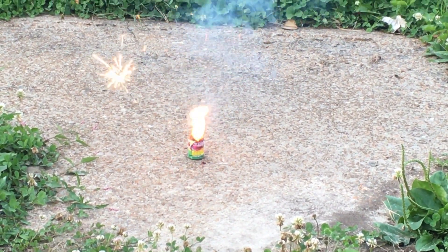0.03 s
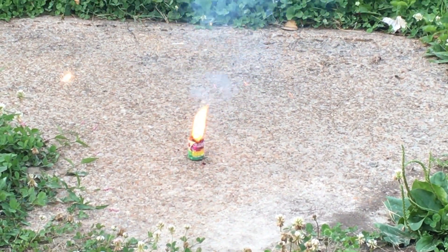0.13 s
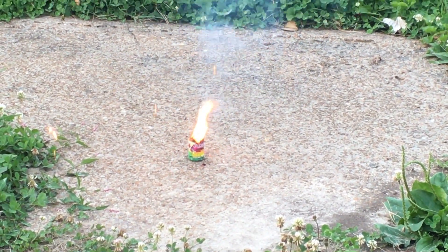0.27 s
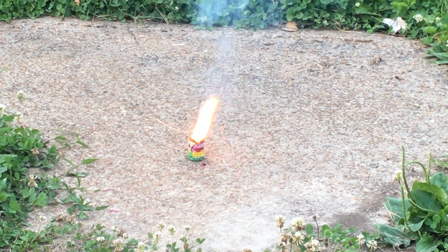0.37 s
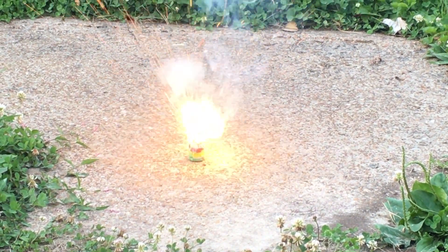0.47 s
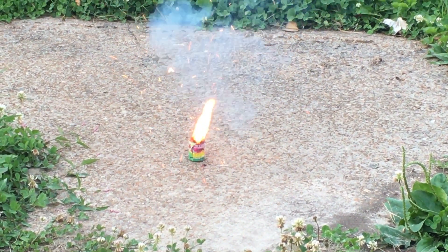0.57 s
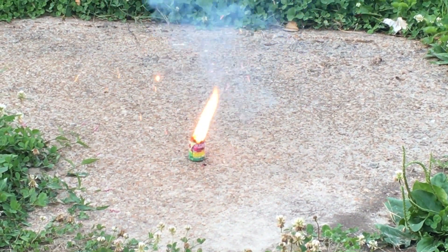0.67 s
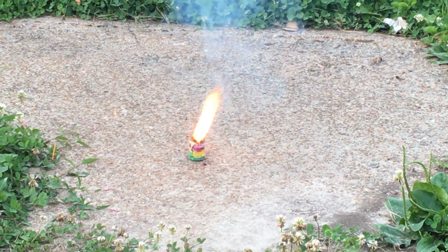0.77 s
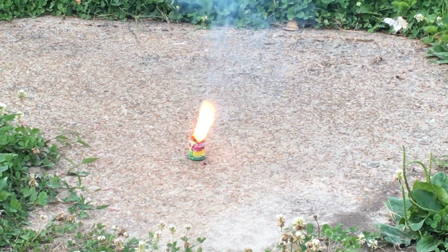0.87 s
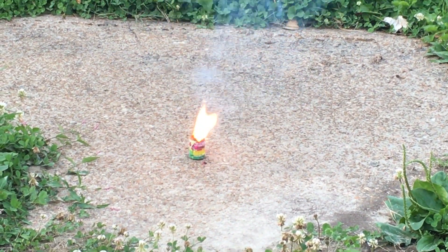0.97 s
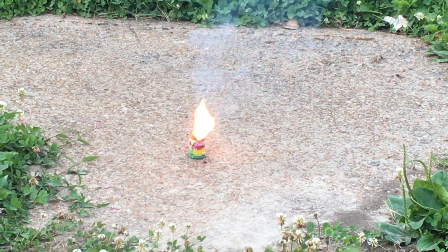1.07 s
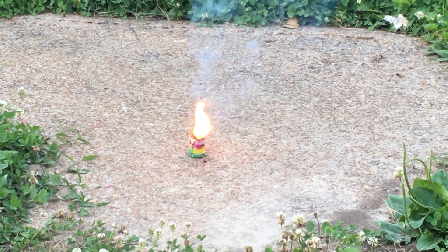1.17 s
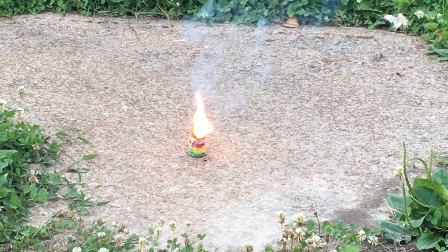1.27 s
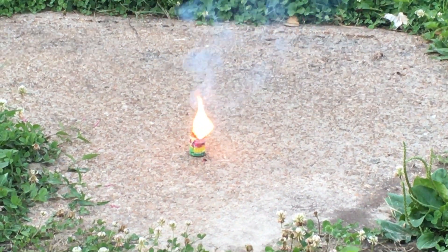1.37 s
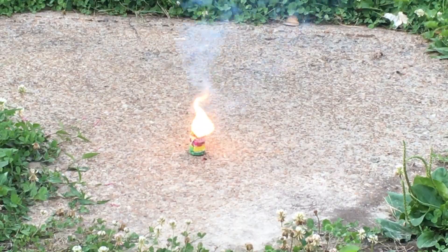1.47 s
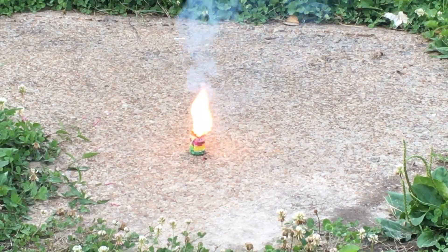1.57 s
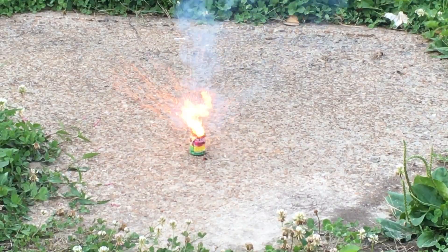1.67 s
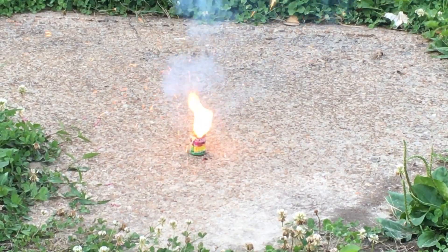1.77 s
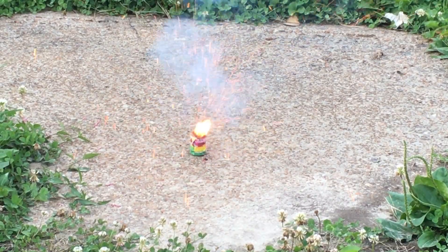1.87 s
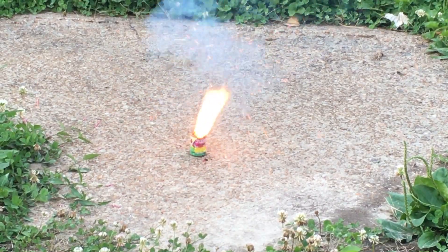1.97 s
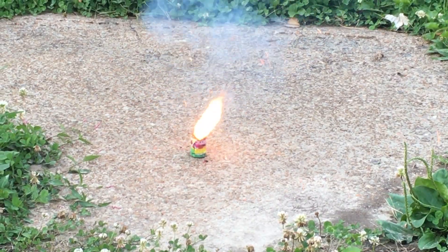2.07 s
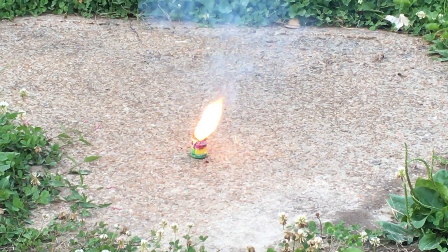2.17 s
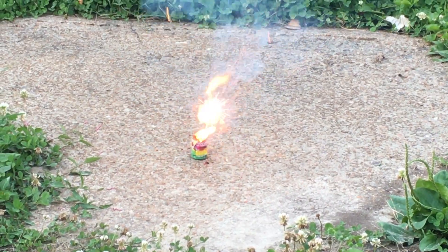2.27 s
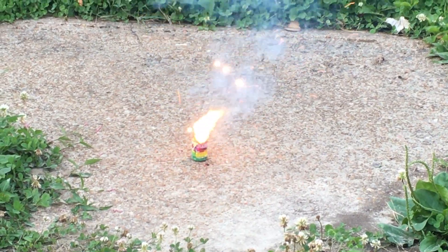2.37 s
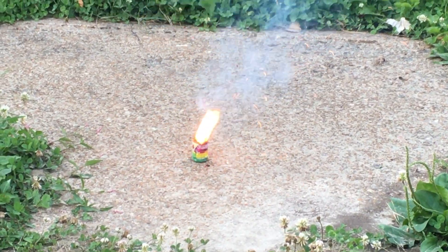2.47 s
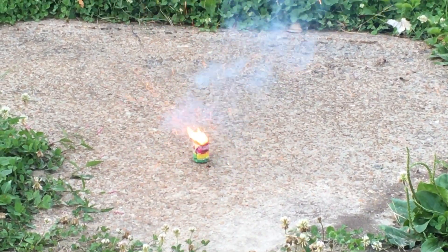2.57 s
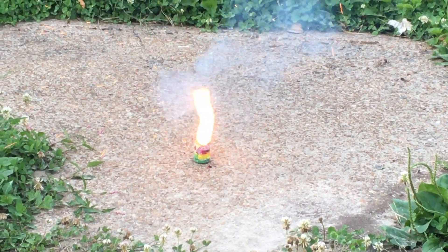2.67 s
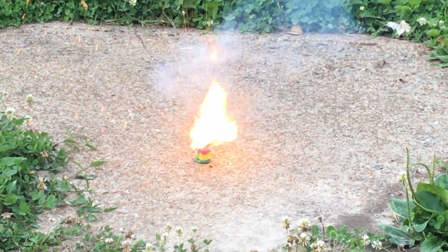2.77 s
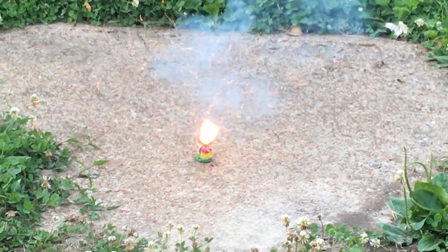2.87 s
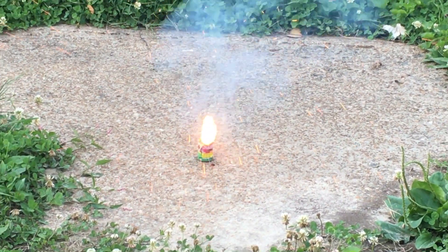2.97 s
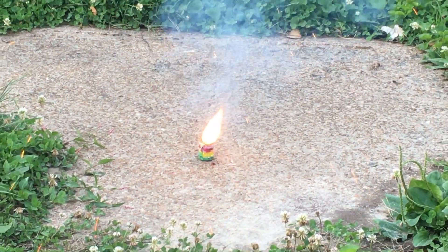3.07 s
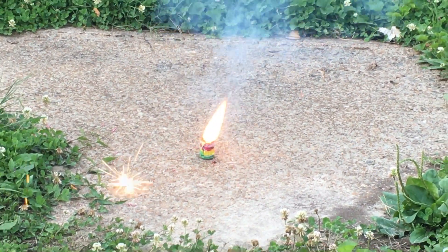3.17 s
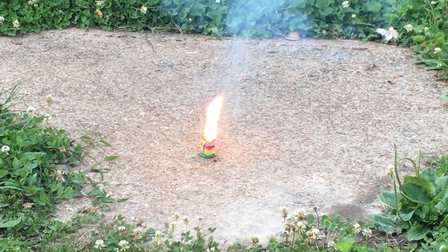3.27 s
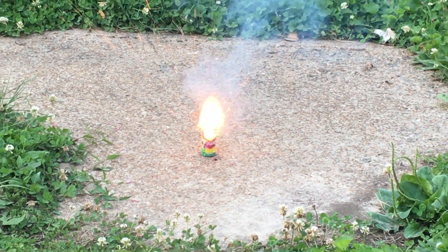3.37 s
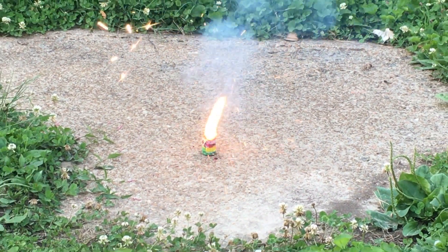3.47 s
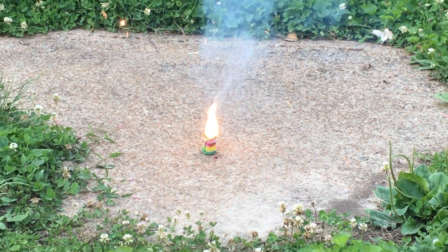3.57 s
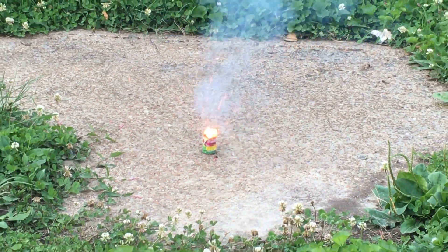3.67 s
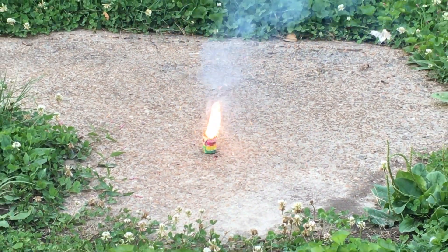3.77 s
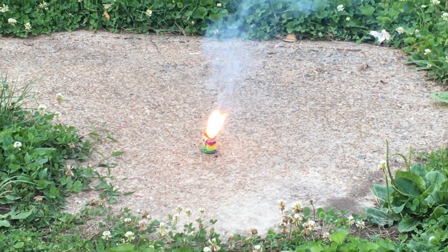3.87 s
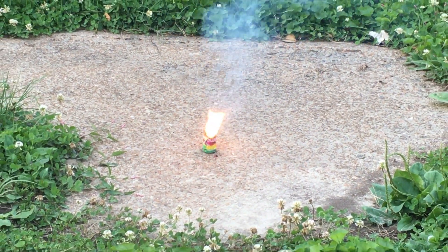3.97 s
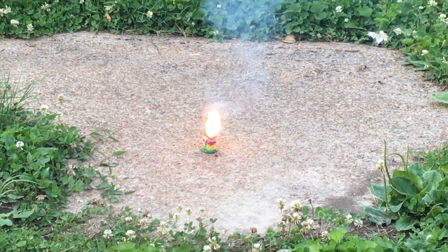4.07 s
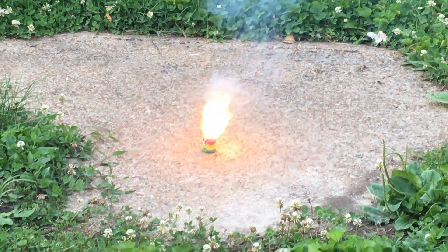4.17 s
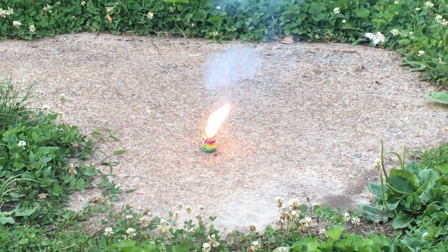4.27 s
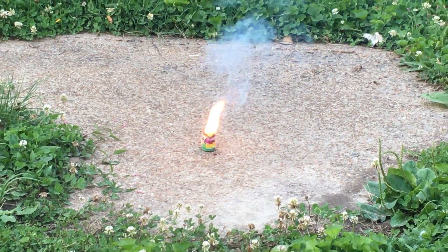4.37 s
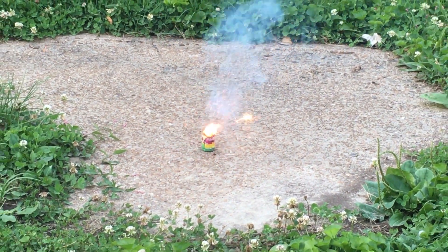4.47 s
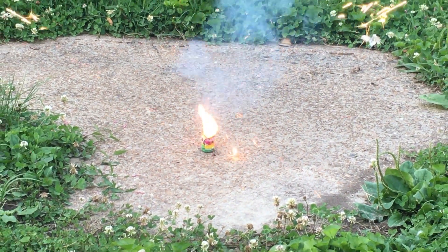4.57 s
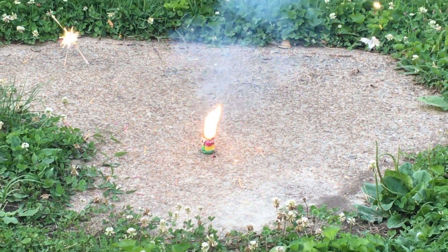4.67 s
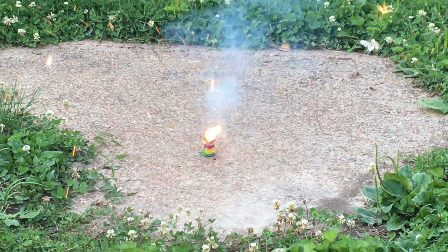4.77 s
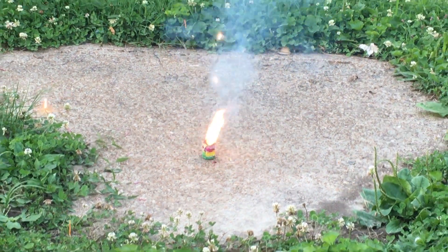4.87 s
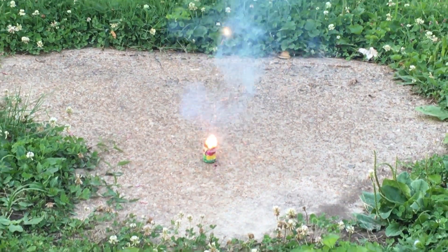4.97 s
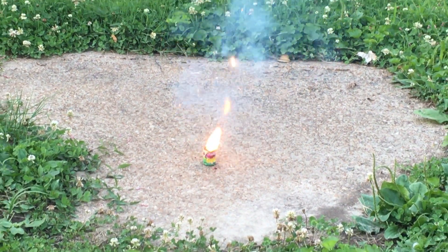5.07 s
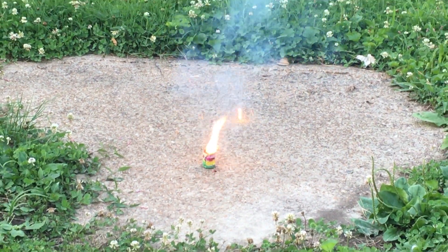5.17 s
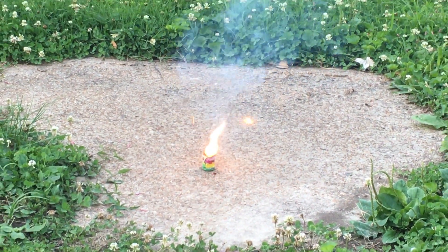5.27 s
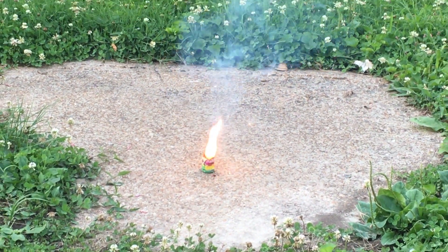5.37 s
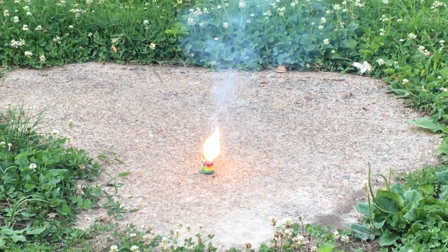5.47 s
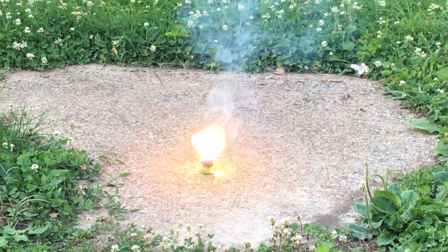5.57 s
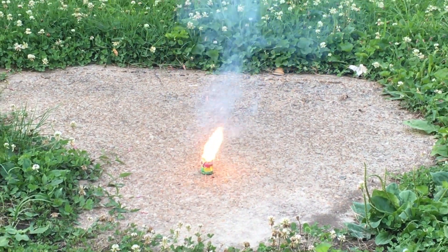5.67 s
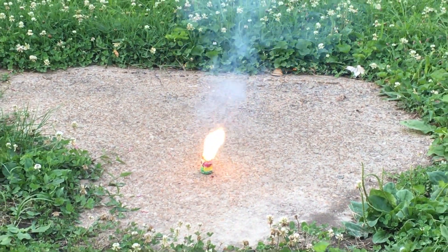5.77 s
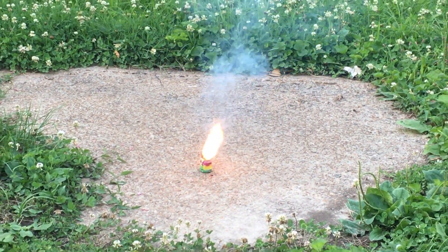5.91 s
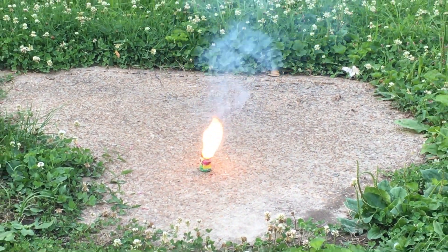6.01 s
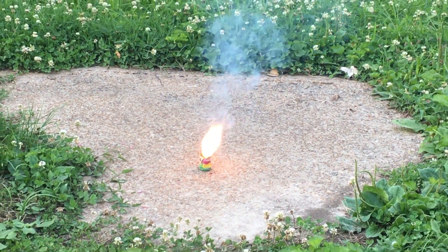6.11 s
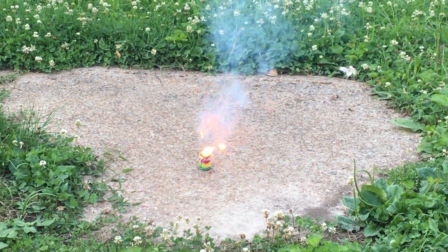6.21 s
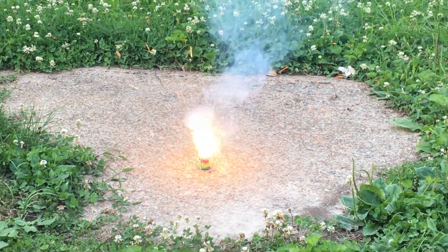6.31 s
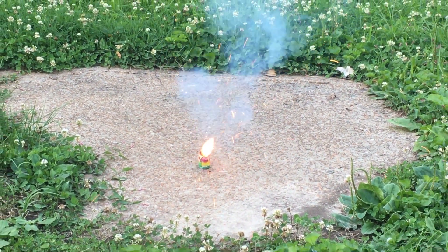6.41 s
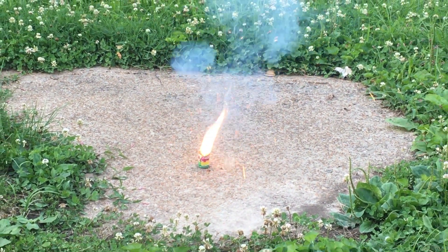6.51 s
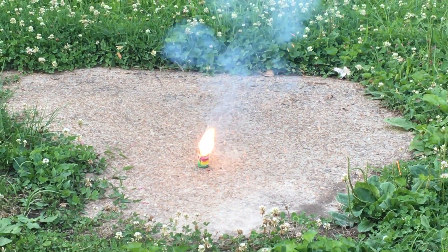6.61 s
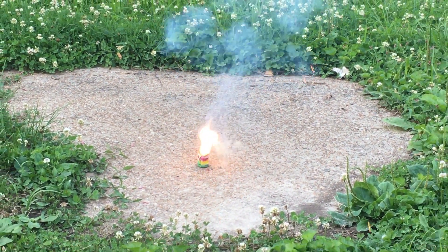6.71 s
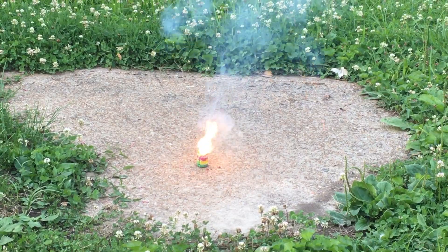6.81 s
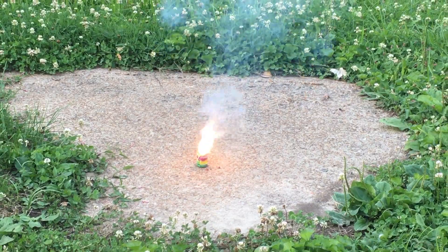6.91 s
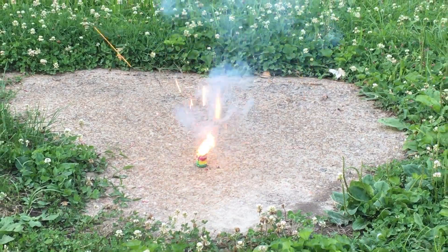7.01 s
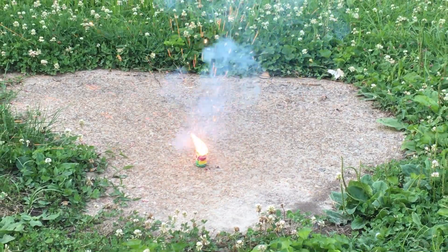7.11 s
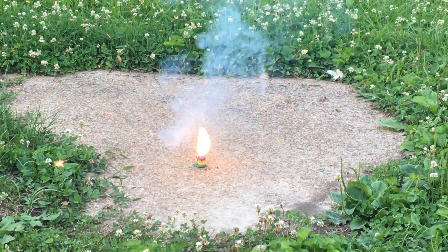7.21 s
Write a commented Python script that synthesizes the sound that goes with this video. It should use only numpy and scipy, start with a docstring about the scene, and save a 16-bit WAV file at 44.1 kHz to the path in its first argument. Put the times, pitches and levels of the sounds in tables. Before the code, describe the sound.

A small ground firework flutters and hisses on concrete, spitting sharp cracks with low thumps in uneven bursts that ring across a yard.

```python
"""A yard with a concrete slab: an older echo is still fading as a small ground firework flutters and hisses.
The flame is low and high noise with a sputter of tiny clicks; occasional short snaps stand beside it.
It spits pellets that burst in uneven runs with gaps between them: a low swell leads into a crack that
sweeps down to a thump. Hard surfaces and plants scatter each burst and the yard rings on in fading noise.
Gain control ducks flame and echoes after the heavy bursts; late in the burn the bursts turn more abrupt."""
import sys
import numpy as np
from scipy import signal
from scipy.fft import rfft, irfft, next_fast_len
from scipy.io import wavfile
from scipy.ndimage import uniform_filter1d, minimum_filter1d, map_coordinates

SR = 44100
rng = np.random.default_rng(int(sys.argv[2]) if len(sys.argv) > 2 else 0)


def generate_wav(signal):
    """Clip the signal to [-1, 1] and save it as 16-bit WAV at the path in sys.argv[1]."""
    frames = np.transpose(np.atleast_2d(signal))
    scaled = np.clip(frames, -1, 1) * 32767
    pcm = np.round(scaled).astype(np.int16)
    wavfile.write(sys.argv[1], SR, pcm)


N = 319725

# The pellets' bursts. Each row: start in seconds, crack energy in dB, then the levels in dB of
# the bark (first part of the downward sweep), the thump and the scatter off the surroundings.
BURSTS = [(0.4222, -9.5, -37, -53, -37), (0.4836, 1, -9.5, 3.5, -18.5), (0.5295, 7, -28, -22.5, -22),
          (1.7044, 3, -18.5, -0.5, -16), (1.8876, 3.5, -13.5, -5, -13), (2.2447, 5.5, -16, -18, -8),
          (2.3103, 5, -10, -17, -13), (2.602, 1, -31, -38, -22.5), (2.6046, 3, -10, -38, -19.5),
          (2.8227, 4.5, -16, -1, -14), (2.8716, 6, -20, -3, -17.5), (2.954, 3.5, -11.5, -2.5, -22),
          (3.3664, 0.5, -11, -9.5, -11), (3.4185, 5, -14.5, -6.5, -16), (3.6962, 3.5, -11, 1.5, -19),
          (4.23, 3.5, -10, -0.5, -18.5), (4.4998, 4.5, -17, -4.5, -16), (4.5507, 6, -12.5, -9, -16),
          (4.77, 4, -11, -1, -20), (4.989, 3.5, -15.5, -4, -15.5), (5.078, 5.5, -20, -26.5, -18.5),
          (5.6405, 0.5, -16.5, -3, -12), (6.2477, 4, -10.5, -3, -14.5), (6.3287, 3.5, -10, -17, -16.5),
          (6.3655, 4, -18, -36, -27.5), (6.3957, 3, -9.5, -1.5, -19.5), (6.501, -7, -24, -62, -38),
          (6.5213, -14, -52, -66, -39.5), (6.6897, 1.5, -10.5, 0, -18), (6.8232, .5, -4, -3, -32),
          (7.039, -4.5, -5, 0.5, -26.5), (7.1218, 2, -8, -0.5, -25.5), (7.1889, -2, -4.5, -2, -25.5)]
# Colour of a small snap. Each row: frequency in Hz, relative density in dB per Hz.
SNAP_COLOUR = [(200, -6), (700, -4.5), (1300, 3), (2500, 2.5), (5000, -1.5), (9700, -12), (16000, -21.5)]
# Colour of the scatter off the ground. Each row: frequency in Hz, relative density in dB per Hz.
SCATTER_COLOUR = [(150, -21.5), (500, 0.5), (1000, -4.5), (1600, -1.5), (2700, -1.5), (4800, -1.5),
                  (6300, 0), (9700, -4.5), (10500, -6.5), (13500, -8), (16000, -12.5)]

BURST_T = np.arange(SR // 10) / SR  # s, time axis of one burst


def amp(db):
    """Amplitude factor for a level in dB."""
    return 10 ** (np.asarray(db) / 20)


def unit(x):
    """Scale to rms 1."""
    return x / np.sqrt(np.mean(x ** 2) + 1e-20)


def along(points, hz):
    """Read (Hz, value) points off a log frequency axis."""
    f, v = np.transpose(points)
    return np.interp(np.log(hz + 1), np.log(f + 1), v)


def wobble(rate):
    """A smooth random curve through rate knots a second."""
    knots = rng.standard_normal(int(N * rate / SR) + 4)
    return map_coordinates(knots, [np.arange(N) * rate / SR])


def noise(spectrum, size):
    """Coloured noise of rms 1: white noise shaped in the frequency domain."""
    m = next_fast_len(size)
    colour = amp(along(spectrum, np.fft.rfftfreq(m, 1 / SR)))
    white = rfft(rng.standard_normal(m))
    return unit(irfft(white * colour, m)[:size])


def click(spectrum, ripple_db, smear, size=1024, count=24):
    """A pulse of energy 1 with the given colour; chance ripples it and delays each band by up to smear s."""
    hz = np.fft.rfftfreq(size, 1 / SR)
    knots = np.linspace(0, SR / 2, count)
    ripple = np.interp(hz, knots, rng.standard_normal(count))
    delay = np.interp(hz, knots, smear * rng.uniform(0, 1, count))
    # folding the cepstrum gives minimum phase: the energy comes as early as it can
    cepstrum = irfft(np.log(amp(along(spectrum, hz) + ripple_db * ripple)))
    cepstrum[1:size // 2] *= 2
    cepstrum[size // 2:] = 0
    delay_phase = 2 * np.pi * np.cumsum(delay) * hz[1]
    pulse = irfft(np.exp(rfft(cepstrum) - 1j * delay_phase))
    pulse = np.roll(pulse, size // 128)[:size // 2]
    return pulse / np.linalg.norm(pulse)


def add(track, s, sound):
    """Mix a sound into the track at time s."""
    start = max(round(s * SR), 0)
    part = sound[:max(N - start, 0)]
    track[start:start + len(part)] += part


def sweep(t, turns, end_hz, knee):
    """A pressure swing whose pitch falls as 1 / time towards end_hz."""
    return -np.sin(2 * np.pi * (turns * np.log1p(t / knee) + end_hz * t))


def yard_tail(size):
    """One diffuse echo from trees and houses: noise in which each band decays at its own rate."""
    # Colour of the echo. Each row: frequency in Hz, relative density in dB per Hz.
    echo_colour = [(200, -28.5), (700, -22.5), (1300, -13.5), (2400, -12), (3600, -3.5), (6300, -1.5),
                   (9600, -4), (10600, -8), (13500, -6), (16000, -21.5)]
    # Decay of the yard. Each row: frequency in Hz, time in seconds to fall by 60 dB.
    decay_times = [(500, 1.9), (3000, 2.62), (7000, 1.85), (15000, 0.8)]
    hz, t, z = signal.stft(noise(echo_colour, size), SR, nperseg=256)
    fade_db = -60 * t / along(decay_times, hz)[:, None]
    return signal.istft(z * amp(fade_db), SR, nperseg=256)[1]


def yard(lingering_db):
    """The echoes of all bursts pile up, on top of one still fading from before."""
    out = np.zeros(N)
    add(out, 0, amp(lingering_db) * yard_tail(size=SR))
    for s, *_, scatter_db in BURSTS:
        echo_db = -39.5 + 0.84 * scatter_db
        tail = yard_tail(size=3 * SR // 2)
        t = np.arange(len(tail)) / SR
        # the wash builds up, with a broad slap from buildings some twenty metres off
        build_up = 1 - np.exp(-t / 0.03)
        slap = 1.1 * np.exp(-((t - 0.112) / 0.028) ** 2)
        add(out, s, amp(echo_db) * (build_up + slap) * tail)
    # the wash is grainy: its level wobbles fast and at random
    grain_db = 1.8 * wobble(450)
    return out * amp(grain_db)


def sputter(count=380):
    """Tiny snaps at random times, most of them very faint."""
    out = np.zeros(N)
    for at, size in rng.uniform(0, 1, (count, 2)):
        snap = click(SNAP_COLOUR, ripple_db=4, smear=0.00031)
        add(out, at * N / SR, amp(24) * size ** 4 * snap)
    return out


def short_snaps():
    """Occasional short snaps, some of them distant echoes of bursts."""
    # Each row: start in seconds, energy in dB.
    snap_times = [(0.111, -26), (0.817, -35), (2.033, -24), (2.365, -21), (2.3882, -13.5), (2.457, -32),
                  (2.519, -25), (2.5402, -19), (5.343, -30), (5.788, -22), (5.995, -21)]
    out = np.zeros(N)
    for s, energy_db in snap_times:
        add(out, s, amp(energy_db) * click(SNAP_COLOUR, ripple_db=0.5, smear=0.00134))
    return out


def flame():
    """The burning jet: low flutter and a sputtering hiss whose levels drift separately but flicker together."""
    # Course of the flame. Each row: time in seconds, flutter level in dB, hiss level in dB.
    course = [(0.04, -55, -57), (0.35, -49.5, -60), (0.75, -64.5, -61), (1.1, -51, -60.5),
              (1.6, -53.5, -60), (1.9, -59, -59), (2.5, -57, -52.5), (3.15, -63, -63.5), (3.6, -59, -56),
              (3.95, -64, -68), (4.7, -61, -60.5), (5.2, -62, -62), (5.55, -51, -58), (6.18, -51.5, -55.5),
              (6.97, -61.5, -64)]
    # Colours of flutter and hiss. Each row: frequency in Hz, relative density in dB per Hz.
    flutter_colour = [(20, -24.5), (50, -0.5), (100, 0), (160, -1), (250, -2), (350, -8.5), (470, -24.5),
                      (900, -65)]
    hiss_colour = [(250, -10), (550, -2.5), (1100, 0), (2000, -1), (3400, -4.5), (5000, -15), (7500, -14.5),
                   (9600, -9), (10600, -17.5), (14400, -17.5), (16000, -34)]
    s, flutter_db, hiss_db = np.transpose(course)
    t = np.arange(N) / SR
    flicker = wobble(2.7)
    flutter_gain = amp(np.interp(t, s, flutter_db) + 0.8 * flicker)
    hiss_gain = amp(np.interp(t, s, hiss_db) + 1.1 * flicker)
    flutter = flutter_gain * noise(flutter_colour, N)
    hiss = hiss_gain * (noise(hiss_colour, N) + sputter())
    return flutter + hiss


def gain_control(x, threshold_db, hold, release):
    """Gain that drops when x is loud, holds, then recovers; hold and release in seconds."""
    level_db = 10 * np.log10(np.abs(uniform_filter1d(x ** 2, SR // 200)) + 1e-12)
    needed_db = np.minimum(threshold_db - level_db, 0)
    span = int(hold * SR) // 2
    held_db = minimum_filter1d(needed_db, 2 * span + 1, origin=span)  # looks back in time
    pole = np.exp(-1 / (release * SR))
    return amp(signal.lfilter([1 - pole], [1, -pole], held_db))


def scatter(ground, alike):
    """Grass and rough concrete answer a few milliseconds late, the hedge more faintly and for longer."""
    t = BURST_T
    hedge = np.exp(-t / 0.022)
    spray = (1 - np.exp(-(t / 0.0017) ** 2)) * np.exp(-t / 0.0055) + amp(-30) * hedge
    # the ground stays where it is, so all bursts share a part of its scatter
    fresh = noise(SCATTER_COLOUR, len(t))
    return spray * (np.sqrt(alike) * ground + np.sqrt(1 - alike) * fresh)


def swell():
    """A low, slightly rough swell that grows into the crack: a decaying swing and noise, time-reversed."""
    # Colour of the rough part. Each row: frequency in Hz, relative density in dB per Hz.
    rough_colour = [(100, -0.5), (400, 0), (600, -5.5), (1100, -21), (2500, -25.5), (8000, -48)]
    t = BURST_T
    smooth = -amp(4.5) * np.exp(-t / 0.0035) * sweep(t, turns=0.95, end_hz=54.5, knee=0.0091)
    rough = amp(-13.5) * np.exp(-t / 0.0077) * noise(rough_colour, len(t))
    return (smooth + rough)[::-1]


def gas():
    """Gas rushes out just after the crack: noise that rises and dies within milliseconds."""
    # Colour of the rush. Each row: frequency in Hz, relative density in dB per Hz.
    gas_colour = [(150, -18.5), (330, -16.5), (430, -1), (620, 2), (800, -6), (1050, -13), (2000, -22),
                  (8000, -55.5)]
    t = BURST_T
    rush = (1 - np.exp(-t / 0.0029)) * np.exp(-t / 0.0052)
    return rush * noise(gas_colour, len(t))


def knock():
    """The hollow knock of the early bursts: damped resonances."""
    # Each row: frequency in Hz, level in dB against the bark before its late fade, decay in seconds.
    resonances = [(426, -21, 0.008), (547, -18.5, .004)]
    t = BURST_T
    return sum(amp(db) * np.sin(2 * np.pi * hz * t) * np.exp(-t / decay) for hz, db, decay in resonances)


def tube():
    """The cardboard tube rings at 1000 Hz for a cycle or two."""
    return np.sin(2 * np.pi * 1000 * BURST_T) * np.exp(-BURST_T / 0.0018)


def bark_and_thump(bark_db, thump_db, late):
    """The pressure swing sweeps down from a bark to a thump, faster in weak bursts, slower late in the burn."""
    t = BURST_T
    early = np.exp(-t / 0.0032)
    paced = t * (1.028 - 0.008 * thump_db - 0.044 * late)
    thump = (1 - early) * np.exp(-(paced / 0.017) ** 1.49)
    size = amp(bark_db) * early + amp(thump_db) * thump
    return size * sweep(paced, turns=0.434, end_hz=25.67, knee=0.00007)


def crack(smear):
    """A shock front, ragged over a fraction of a millisecond."""
    # Each row: frequency in Hz, relative density in dB per Hz.
    crack_colour = [(200, -24.5), (600, -1), (1100, -0.5), (1700, -2.5), (2700, 8.5), (4800, 0.5),
                    (6300, 2.5), (9700, 5), (10500, -3.5), (13500, -2.5), (16000, -15.5)]
    return click(crack_colour, ripple_db=3, smear=smear)


def bursts(alike):
    """A low swell leads into each burst's crack, knock and sweep down to a thump; surroundings throw it back."""
    # Nearby hard surfaces. Each row: delay in seconds, level in dB before walls_db and the scatter level.
    walls = [(0.0134, -33.5), (0.0155, -27.5), (0.025, -31.5), (0.027, -25.5), (.035, -29), (0.038, -20.5),
             (.041, -24.5)]
    walls_db = 16
    out = np.zeros(N)
    ground = noise(SCATTER_COLOUR, len(BURST_T))
    for s, crack_db, bark_db, thump_db, scatter_db in BURSTS:
        # late in the burn: less swell, gas and knock, more ring of the tube
        late = max(s - 4.26, 0)  # s
        swell_db = -8 + 0.61 * thump_db - 7 * late
        gas_db = -12.5 + 0.97 * bark_db - 1.5 * late
        knock_db = bark_db - 19 * late
        tube_db = -21 + bark_db + 8 * min(late, 1)  # grows for one second, then stays
        add(out, s - len(BURST_T) / SR, amp(swell_db) * swell())
        add(out, s, amp(crack_db) * crack(smear=0.00065))
        add(out, s, bark_and_thump(bark_db, thump_db, late))
        add(out, s, amp(tube_db) * tube())
        add(out, s, amp(knock_db) * knock())
        add(out, s, amp(gas_db) * gas())
        add(out, s, amp(scatter_db) * scatter(ground, alike))
        for delay, wall_db in walls:
            add(out, s + delay, amp(walls_db + wall_db + scatter_db) * crack(smear=0.00075))
    return out


def scene():
    """Bursts over a background of flame, snaps and echoes that ducks after the heavy ones."""
    pops = bursts(alike=0.69)
    background = flame() + short_snaps() + yard(lingering_db=-55.5)
    gain = gain_control(pops + background, threshold_db=-14.5, hold=0.058, release=0.012)
    return (pops + gain * background)[None]


def record(dry):
    """The recorder rounds off the highest peaks and cuts steeply above its band limit."""
    ceiling, top_hz = 0.8, 15900
    rounded = dry / (1 + np.abs(dry / ceiling) ** 6) ** (1 / 6)
    m = next_fast_len(N + SR // 2)
    hz = np.fft.rfftfreq(m, 1 / SR)
    low_pass = 1 / (1 + (hz / top_hz) ** 80)
    return irfft(rfft(rounded, m) * low_pass, m)[..., :N]


dry = scene()
out = record(dry)
generate_wav(out)
```